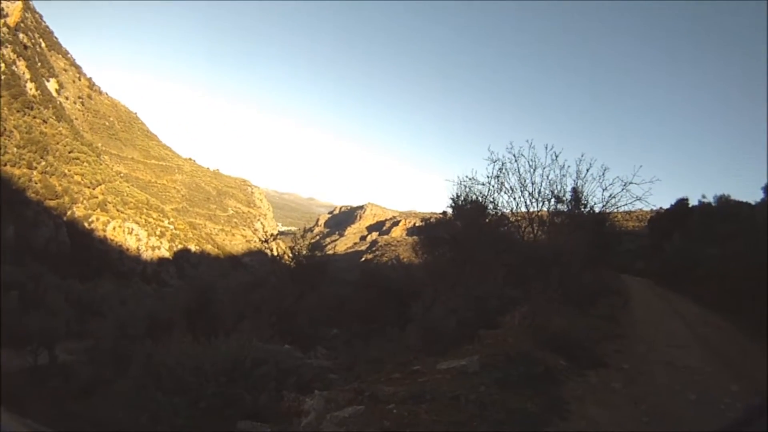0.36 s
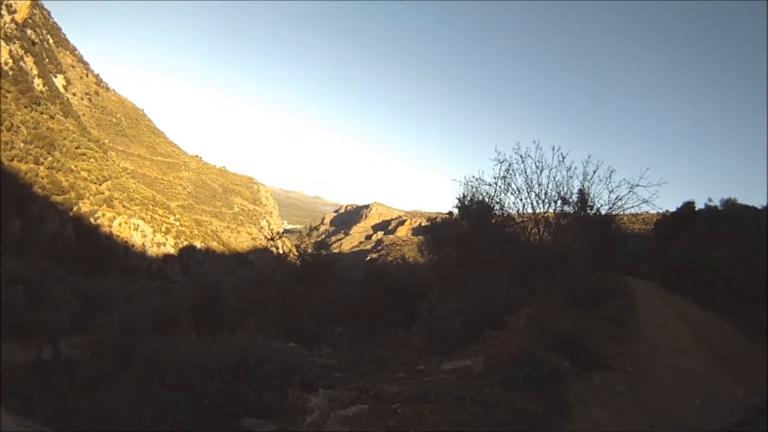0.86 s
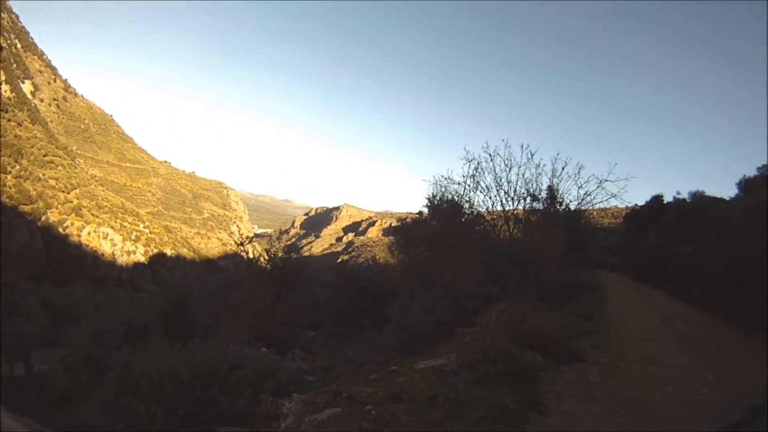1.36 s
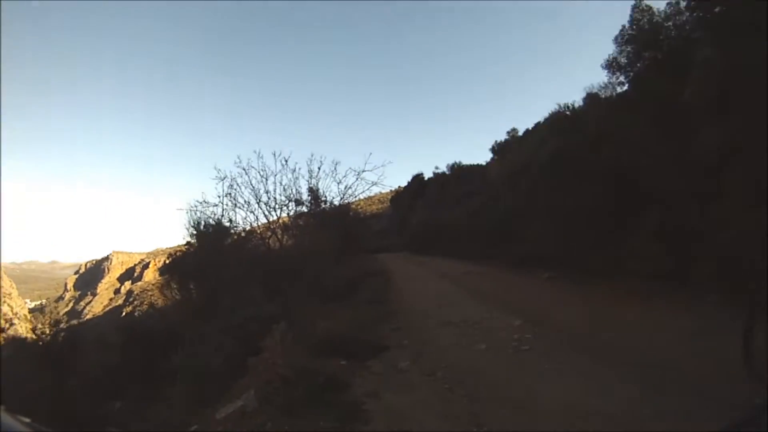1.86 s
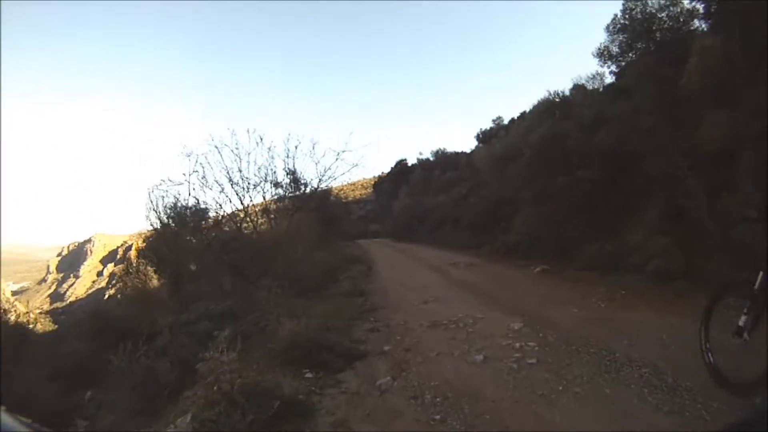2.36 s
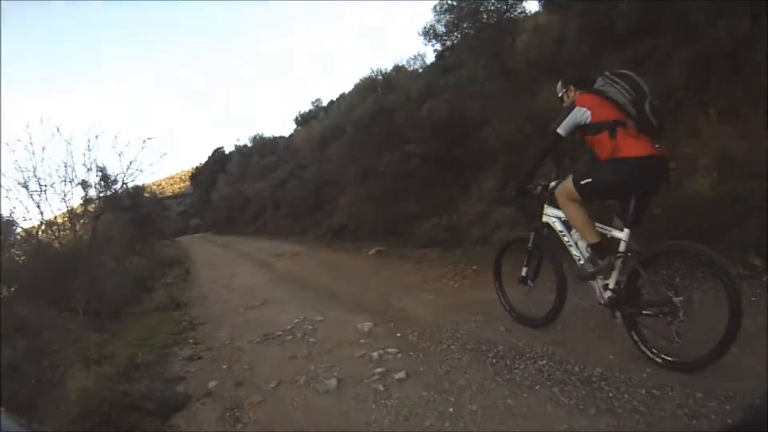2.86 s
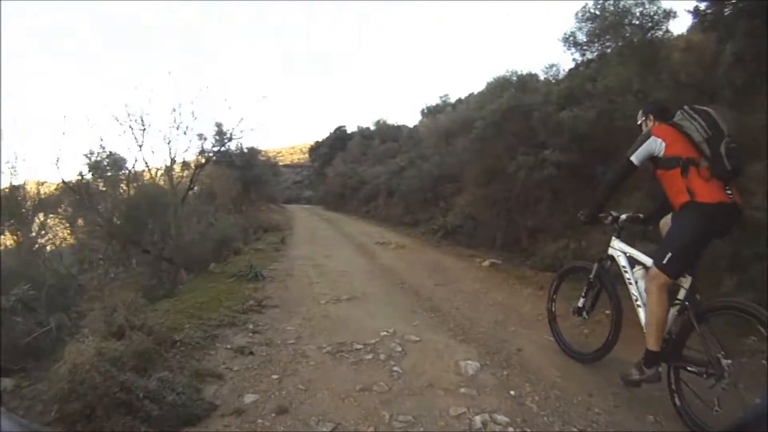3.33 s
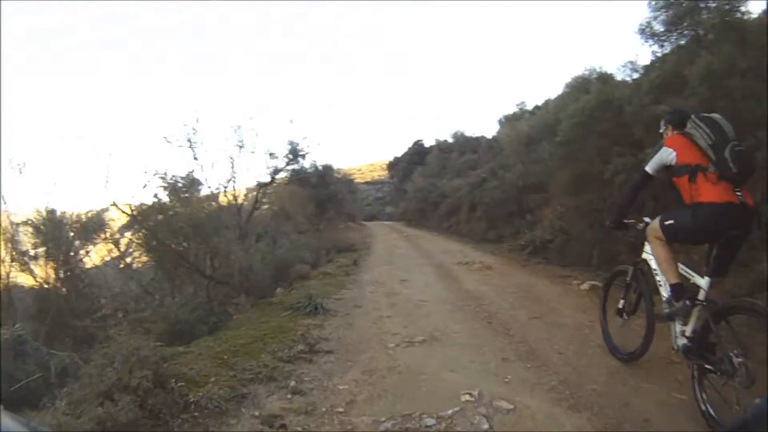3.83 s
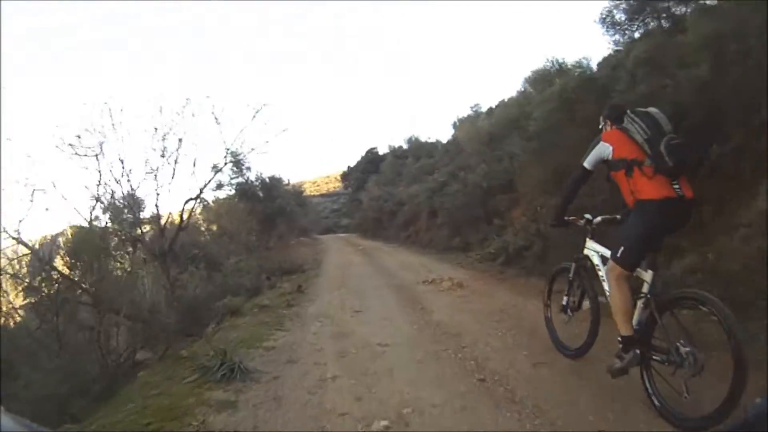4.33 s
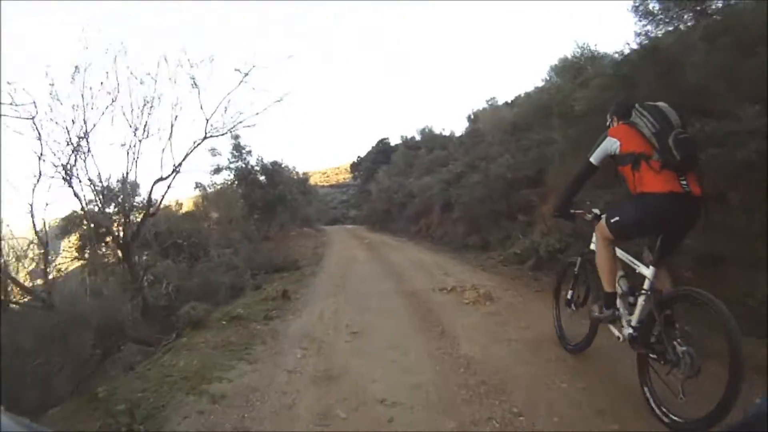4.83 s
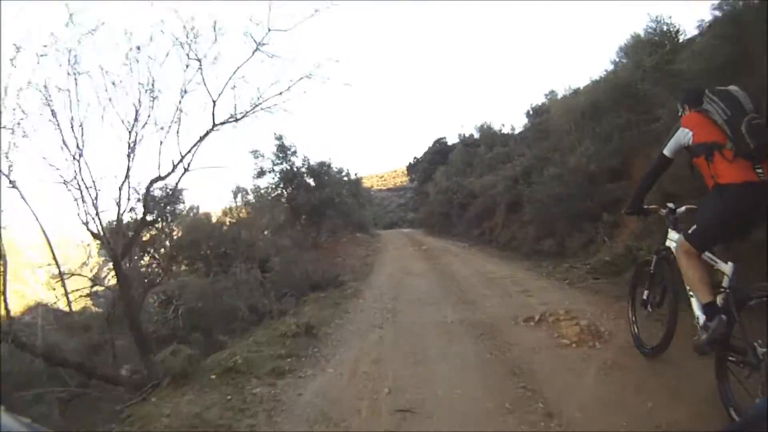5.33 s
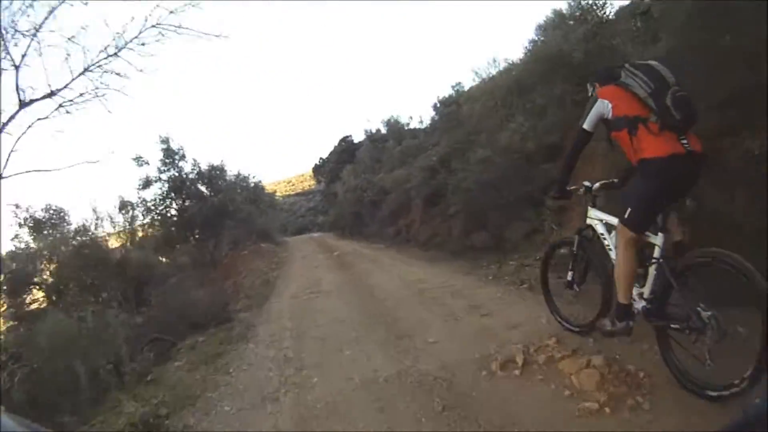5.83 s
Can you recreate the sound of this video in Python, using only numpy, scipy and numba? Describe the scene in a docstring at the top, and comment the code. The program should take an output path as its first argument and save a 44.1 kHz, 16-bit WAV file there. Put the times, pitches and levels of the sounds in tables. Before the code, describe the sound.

Near-stillness gives way to gravel crunch and low shaking, with hard clacks around three and a half seconds and busy rattling afterwards.

```python
"""A small camera in a plastic housing rides a mountain bike up a gravel track, from standstill to a slow roll.
From the start there is shaped noise as air, low noise ringing in the mount, a housing drone from jolted
resonances, gravel crunch from many short noise bursts, and small random ticks: pings with a noise crack.
Stronger ticks begin at 0.34 s; from 0.8 s blows knock ringing tones out of the housing.
From 3 s a loose part buzzes in the dips. The camera ducks, clips and holds slow samples, mirroring the treble."""
import sys
import numpy as np
from scipy import signal
from scipy.fft import rfft, irfft, next_fast_len
from scipy.io import wavfile
from scipy.ndimage import uniform_filter1d
from numba import njit

SR = 44100
rng = np.random.default_rng(int(sys.argv[2]) if len(sys.argv) > 2 else 0)


def nominal_scale(level):
    """Amplitude ratio for a level in decibels (scalar or array-like)."""
    x = np.asarray(level, float) / 20
    return 10 ** x


def materialize(psi):
    """Save the field psi as 16-bit PCM at rate SR to the path in sys.argv[1].

    A 1-D psi becomes a single channel; in a 2-D psi each row is a channel.
    """
    bounded = np.clip(np.atleast_2d(psi).T, -1, 1)
    quanta = np.round(bounded * 32767).astype(np.int16)
    wavfile.write(sys.argv[1], SR, quanta)


N = 272979  # length in samples
T = np.arange(N) / SR  # time in seconds


def level(x, db):
    """Scale a sound to an rms level in dB."""
    return x * nominal_scale(db) / np.sqrt(np.mean(x ** 2))


def ring(x, modes):
    """Let a sound excite resonances, each with its own pitch, width and level, and sum them."""
    out = 0
    for hz, width_hz, db in modes:
        b, a = signal.iirpeak(hz, hz / width_hz, fs=SR)
        out = out + nominal_scale(db) * signal.lfilter(b, a, x)
    return out


def colour(x, spectrum):
    """Filter a sound to follow points of frequency and gain, joined along a log frequency scale."""
    hz, db = np.transpose(spectrum)
    size = next_fast_len(N)
    bins_hz = np.arange(size // 2 + 1) * SR / size + 1  # 1 Hz up, to avoid log(0)
    gain = nominal_scale(np.interp(np.log(bins_hz), np.log(hz), db))
    return irfft(rfft(x, size) * gain, size)[:N]


def walk(rate):
    """Random values, rate of them per second, smoothed twice into a wander with a spread near 1."""
    k = int(SR / rate)
    held = np.repeat(rng.standard_normal(N // k + 1), k)
    return 1.3 * uniform_filter1d(uniform_filter1d(held, k), k)[:N]


def grains(rate, scatter_db, tail_s):
    """Noise in short dying bursts at random moments, about rate per second, a few much stronger."""
    strength = nominal_scale(np.minimum(scatter_db * rng.exponential(size=N), 24))
    starts = (rng.random(N) < rate / SR) * strength
    envelope = signal.lfilter([1], [1, -np.exp(-1 / (tail_s * SR))], starts)
    return rng.standard_normal(N) * envelope


def add(out, s, sound):
    """Lay a sound in at time s."""
    i = int(s * SR)
    out[i:i + len(sound)] += sound[:N - i]


def fade(t, swell_ms, t60, press_ms=0.):
    """Swell, stay while the contact lasts, then die away by 60 dB in t60 seconds."""
    swell_s = max(swell_ms, .2) / 1000
    free_s = np.maximum(t - swell_s - press_ms / 1000, 0)
    swell = np.sin(np.pi / 2 * np.minimum(t / swell_s, 1)) ** 2
    return swell * 1000 ** (-free_s / t60)


# Tone balance of the air noise: (frequency [Hz], relative level [dB])
AIR_SPECTRUM = [(15, -51), (25, -14), (108, 0), (179, -2.5), (523, -5), (826, -23), (2310, -39),
                (2770, -10), (4090, -71), (4910, -43), (5900, -40), (7670, -65), (13000, -120)]


def air():
    """Light wind and far rustle: shaped noise whose strength wanders a little."""
    flutter = nominal_scale(1.5 * walk(9.1))
    return level(colour(rng.standard_normal(N) * flutter, AIR_SPECTRUM), -57)


# Resonances of the springy clamp: (frequency [Hz], width [Hz], relative level [dB])
MOUNT_MODES = [(66.7, 21.6, 18.5), (78.8, 4.5, 14)]


def mount(db):
    """The camera bounces on its springy clamp; the rubber pad weakens faster shaking."""
    push = rng.standard_normal(N) * nominal_scale(1.26 * walk(12))
    bounce = ring(push, MOUNT_MODES)
    rubber_pad = signal.butter(4, 100., fs=SR, output="sos")  # low-pass at 100 Hz
    return nominal_scale(db) * level(signal.sosfilt(rubber_pad, bounce), 0)


# Resonances of the plastic shell: (frequency [Hz], width [Hz], relative level [dB])
HOUSING_MODES = [(344, 22.3, -0.5), (471, 21, -7.5), (565, 37, 9.5), (630, 45, -4.5), (688, 15, -12),
                 (927, 28, -7.5), (1242, 58, -5.5), (1422, 30, -14)]


def housing(db):
    """Tread and small stones shake the shell; each mode takes its own jolts over a steady buzz."""
    buzz = level(rng.standard_normal(N), -1.2)
    shell = np.zeros(N)
    for mode in HOUSING_MODES:
        jolts = level(grains(90, 0.9, 0.0023), -1.2)
        shell += ring(buzz + jolts, [mode])
    return nominal_scale(db) * level(shell, 2.6)


# Tone balance of gravel, also used for the cracks of ticks: (frequency [Hz], relative level [dB])
GRAVEL_SPECTRUM = [(470, -11), (800, -54), (930, -8), (1030, -9), (1260, -5.5), (1680, -5.5), (2760, 0),
                   (3310, 0), (4050, -9.5), (4870, -9), (5900, -18), (7670, -66), (13000, -120)]


def gravel(db):
    """Dense crunch under both tyres: every stone size clicks in its own band, over a rough hiss."""
    stones = np.zeros(N)
    for hz in 950 * 1.3 ** np.arange(7):
        clicks = ring(grains(130, 4.2, 0.002), [(hz, hz / 7, 0)])
        stones += np.sqrt(hz) * level(clicks, -46.5)
    grit = level(grains(200, 3.7, 0.0018), -9.5)
    hiss = level(rng.standard_normal(N) * nominal_scale(0.24 * walk(25.4)), 0.87)
    return nominal_scale(db) * level(colour(stones + grit + hiss, GRAVEL_SPECTRUM), 3.44)


# Pitches the small random ticks choose from: (frequency [Hz])
STRAY_PITCHES = [920, 1250, 1322, 3100]


def stray_ticks(shake_db):
    """List small ticks at random moments, stronger where the housing shakes more."""
    per_s, above_shake_db, scatter_db, mean_swell_ms = 16, 2.5, 2.5, 1.7
    when, pick, size, length = rng.random((int(per_s * N / SR), 4)).T
    db = shake_db[(when * N).astype(int)] + above_shake_db - scatter_db * np.log(1 - size)
    hz = np.array(STRAY_PITCHES)[(pick * len(STRAY_PITCHES)).astype(int)]
    return list(zip(when * N / SR, db, hz, 2 * mean_swell_ms * length))


# Stones and cables against frame and housing:
# (time [s], strength before the part gains below [dB], pitch [Hz], swell [ms])
TICK_EVENTS = [(0.3447, -36, 3160, 1.4), (0.5102, -38, 3160, 1.1), (0.5818, -41, 2970, 2.3),
               (0.7976, -32.5, 1146, 1), (1.1545, -35.5, 974, 0.5), (1.2096, -39.5, 3140, .8),
               (1.2683, -33.5, 1730, 0.47), (1.3087, -39, 960, .9), (1.331, -40, 1710, .7),
               (1.3429, -32, 2120, 1.6), (1.4111, -29, 2210, 0.41), (1.4308, -38, 2920, .6),
               (1.4586, -38, 980, 0.64), (1.4729, -41, 1260, 5), (1.5197, -41, 1000, 3.9),
               (1.5918, -21.5, 1284, 6.2), (1.5921, -21.5, 770, 1.1), (1.6821, -37.5, 920, 1),
               (1.7698, -37, 2169, .5), (1.9827, -32.5, 1890, 1.4), (1.9994, -27.5, 1740, 1.4),
               (2.0481, -32.5, 930, 1), (2.076, -29, 3430, 8.4), (2.0927, -22.5, 1970, 6.8),
               (2.1018, -25, 1680, 0.66), (2.5166, -35.1, 1427, 1.7), (2.527, -35, 2590, 3.8),
               (2.5617, -34, 2700, 1.1), (2.675, -26.5, 1740, 1), (2.835, -24, 1260, 2.9),
               (2.943, -6.5, 1790, 0.89), (3.227, -33.5, 2620, 1.0), (3.358, -35, 1250, 5.5),
               (3.3753, -16.5, 1367, 10.5), (3.3808, -14.5, 1950, 1.9), (3.3865, -4, 2920, 2.8),
               (3.5067, -36, 895, 0.85), (3.6182, -39, 2100, 1.3), (3.653, -32.5, 3460, 0.71),
               (3.957, -31, 930, 0.8), (3.9937, -34, 930, 1.2), (4.031, -30.5, 1110, .8),
               (4.0667, -35.5, 2955, 0.9), (4.2142, -28, 3470, 0.59), (4.2762, -26.5, 2210, 0.62),
               (4.2913, -34, 3140, 1.8), (4.3015, -27, 1237, 7.6), (4.3426, -32.5, 1216, 3),
               (4.383, -34, 3200, 1.3), (4.3965, -31, 1150, 3), (4.4332, -28, 1110, 1.2),
               (4.443, -26, 4020, 1.6), (4.462, -29, 2573, 3.3), (4.4718, -26, 1174, 2),
               (4.8317, -34, 1300, 2.6), (4.863, -38, 1330, 2.2), (4.8859, -26.5, 3930, 1.3),
               (4.994, -32, 4050, 5.7), (5.0425, -25.5, 1436, 3.5), (5.1735, -25.5, 1150, 3.3),
               (5.208, -34, 1250, 2.2), (5.3162, -32.5, 1320, 2.2), (5.3871, -25, 1420, 4.3),
               (5.4112, -30.5, 1210, 1.8), (5.4765, -28, 3989, 1.6), (5.4845, -14.5, 3140, 0.95),
               (5.5148, -24.5, 867, 8.1), (5.5498, -26.5, 926, 6.4), (5.5536, -16, 920, 1.7),
               (5.6606, -31, 3920, 1.5), (5.7427, -28, 3900, 1.3), (5.9296, -38.5, 1288, 5.5),
               (6.0633, -33.5, 3950, 5)]


def ticks(rows):
    """A short ping, a weaker neighbour and a dry crack that also stirs the upper shell modes."""
    out, cracks, t = np.zeros(N), np.zeros(N), T[:SR // 8]
    neighbours = rng.uniform(0.92, 1.451, len(rows))  # as ratios to the main pitch
    for (s, db, hz, swell_ms), near in zip(rows, neighbours):
        t60 = 0.033 * (hz / 1000) ** -0.94  # seconds; higher pitches die sooner
        neighbour_hz = min(near * hz, 4800)
        ping = np.sin(2 * np.pi * hz * t) + nominal_scale(-6) * np.sin(2 * np.pi * neighbour_hz * t)
        add(out, s, nominal_scale(db - 2.5) * fade(t, swell_ms, t60) * ping)
        add(cracks, s, nominal_scale(db) * fade(t, swell_ms, 1.36 * t60) * rng.standard_normal(len(t)))
    dry_cracks = nominal_scale(1.0) * colour(cracks, GRAVEL_SPECTRUM)
    shell = nominal_scale(10.0) * ring(cracks, HOUSING_MODES[5:])
    return out + dry_cracks + shell


# Blows through the frame:
# (time [s], peak of the tone before the shell adds to it [dB], pitch [Hz], swell [ms], contact [ms])
KNOCK_EVENTS = [(0.7975, -36, 410, 1.6, 1), (1.5969, -22, 579, 0.78, 10.2), (2.0477, -27.5, 673, 2.7, 0.76),
                (2.518, -30.5, 565, 1.3, 7.2), (2.6381, -35.5, 582, 2, 5), (2.836, -25.5, 665, 4.6, 0.37),
                (3.2212, -36, 584, 2.6, 12), (3.3576, -26.5, 527, 1.2, 18), (3.3816, -9, 540, 2, 6.6),
                (3.3941, -16.5, 572, 6.7, 2.7), (3.491, -34, 576, 4.8, 9), (3.5616, -6.5, 630, 2.63, 3.7),
                (3.7083, -31.5, 565, 3.6, 5.6), (4.0303, -30.5, 634, 1.9, 3.6),
                (4.3023, -16, 513, 3.8, 3.1), (4.379, -25, 398, 1.8, 1.7), (4.3958, -27, 533, 9.4, 4.6),
                (4.4601, -21, 537, 8.7, 3.7), (4.9001, -35.5, 552, 7.8, 13), (5.0035, -32, 576, 1.9, 8.9),
                (5.0465, -19, 630, 5.2, 0.95), (5.37, -32, 544.4, 12.5, 13), (5.5179, -18, 533, 2.2, 9.7),
                (5.554, -16.5, 538, 1.5, 6.3), (5.7322, -35, 533, 3, 13), (5.9797, -34.5, 580, 4.4, 13),
                (6.1195, -35, 575, 5.3, 9)]


def knocks():
    """Each blow swells a shell tone that rings on in the modes; its first jolt wakes the other modes."""
    tones, jolts, t = np.zeros(N), np.zeros(N), T[:SR // 4]
    for s, db, hz, swell_ms, press_ms in KNOCK_EVENTS:
        envelope = fade(t, swell_ms, 0.013, press_ms)  # dies once the contact lets go
        add(tones, s, nominal_scale(db) * envelope * np.sin(2 * np.pi * hz * t))
        add(jolts, s, nominal_scale(db) * fade(t, swell_ms, 0.01) * rng.standard_normal(len(t)))
    return tones + ring(nominal_scale(-14) * tones + nominal_scale(12.5) * jolts, HOUSING_MODES)


# Spells in which the loose part buzzes: (start time [s], end time [s], gain [dB])
BUZZ_SPELLS = [(3.03, 3.05, -47), (3.11, 3.14, -42), (3.43, 3.492, -51), (4.08, 4.17, -54.5),
               (4.31, 4.402, -46.5), (4.473, 4.533, -46), (4.9, 5.016, -53), (5.105, 5.204, -45),
               (5.568, 5.7, -46), (5.74, 5.77, -49), (5.96, 5.986, -48), (6.103, 6.155, -46.5)]


def loose_part(bounce):
    """In its spells it lifts off and buzzes briefly at the bottom of each dip of the bounce."""
    swing = np.sqrt(uniform_filter1d(bounce ** 2, size=SR // 20)) + 1e-9  # rms over 50 ms
    dip = np.tanh(np.maximum(-bounce / swing - .6, 0) / 0.31)
    rattle = dip * grains(550, 1.3, 0.0012)
    buzz = level(ring(rattle, [(4000, 600, 0)]), 0)
    gain = sum(nominal_scale(db) * ((T > start) & (T < end)) for start, end, db in BUZZ_SPELLS)
    return buzz * gain


# Course of the ride; housing() adds 2.6 dB and gravel() 3.44 dB to their columns:
# (time [s], mount bounce level [dB], housing drone level [dB], gravel level [dB])
RIDE_LEVELS = [(0.0, -65.5, -62.5, -62.5), (.35, -65, -67, -58.5), (1.26, -68, -67.5, -60),
               (1.5, -59, -54.5, -60), (1.69, -47.5, -46.5, -60), (2.12, -56, -51, -52),
               (2.39, -47.5, -50.5, -59), (2.5, -56, -49, -52.5), (3.08, -44, -50, -51.5),
               (3.24, -50, -53, -53), (3.41, -30.5, -48, -50.5), (3.55, -45, -44.5, -52),
               (3.59, -50, -48, -69), (3.7, -46, -45.5, -54), (3.87, -44.5, -44.5, -50.5),
               (4.27, -38, -44, -48), (4.34, -30, -40, -45), (4.39, -38, -43, -48.5),
               (4.45, -28.5, -45, -46.5), (4.59, -53, -45.5, -52.5), (4.64, -34.5, -43.5, -51),
               (4.79, -49, -49.5, -55), (4.87, -34, -45, -51.5), (5.02, -36, -43, -49),
               (5.33, -40, -45, -54), (5.4, -33, -41, -50.5), (5.46, -41.5, -42.5, -51),
               (6.02, -38.5, -46, -54), (6.19, -39, -42, -51.5)]


def scene():
    """Everything reaches one microphone, mostly through the housing."""
    s, *columns = np.transpose(RIDE_LEVELS)
    mount_db, housing_db, gravel_db = (np.interp(T, s, column) for column in columns)
    bounce = mount(mount_db)
    steady = air() + bounce + housing(housing_db) + gravel(gravel_db)
    hits = ticks(TICK_EVENTS + stray_ticks(housing_db)) + knocks()
    return (steady + hits + loose_part(bounce))[None]


@njit
def duck(x, top, attack, release):
    """Gain control: follows the peaks, turns down above top, comes back slowly."""
    y, e = np.empty(len(x)), 0.
    for i in range(len(x)):
        e += (abs(x[i]) - e) * (attack if abs(x[i]) > e else release)
        y[i] = x[i] * min(1., top / (e + 1e-9))
    return y


def band_limit(x):
    """A steep low-pass at the top of the band."""
    return signal.sosfilt(signal.butter(12, 16340, fs=SR, output="sos"), x)


def record(dry):
    """Duck, sample at 12 kHz, clip, hold every sample for four steps of 48 kHz, cut the top."""
    ducked = duck(dry[0], 0.067, 1 / (0.019 * SR), 1 / (.06 * SR))  # 19 ms attack, 60 ms release
    slow = signal.resample_poly(ducked, 40, 147)  # to 12 kHz
    clipped = np.clip(slow, -0.47, 0.47)
    held = np.repeat(clipped, 4)  # the steps mirror the sound into the treble
    x = signal.resample_poly(held, 147, 160)[:N]  # 48 kHz back to SR
    x = np.pad(x, (0, N - len(x)))
    top_cut = signal.ellip(8, .2, 50, 15300, fs=SR, output="sos")  # low-pass at 15.3 kHz
    mix = signal.sosfilt(top_cut, x)[None]
    return band_limit(mix)


dry = scene()
out = record(dry)
materialize(out)
```